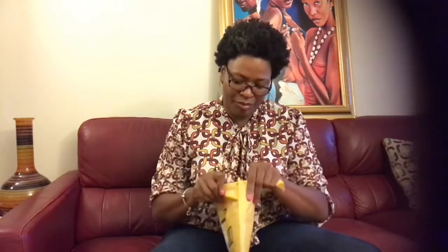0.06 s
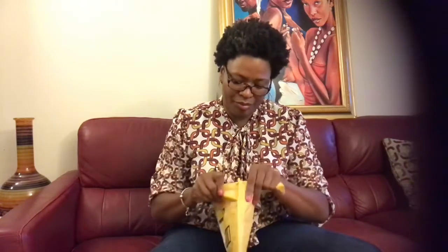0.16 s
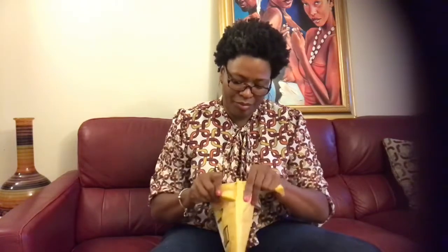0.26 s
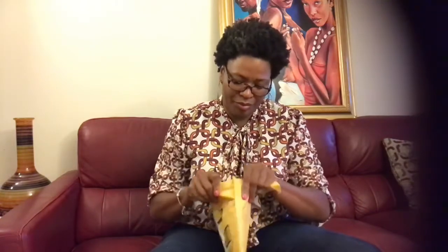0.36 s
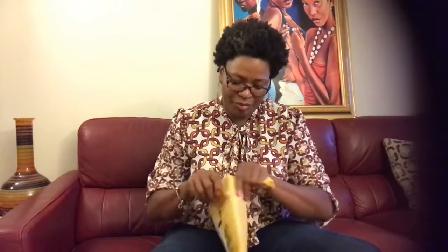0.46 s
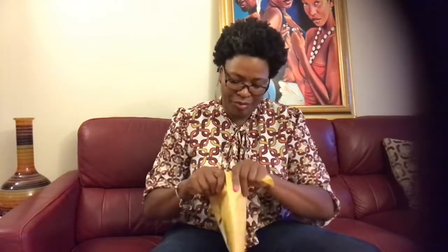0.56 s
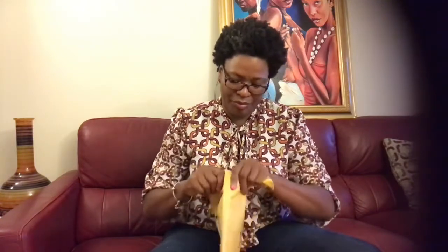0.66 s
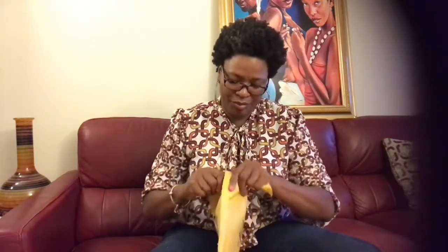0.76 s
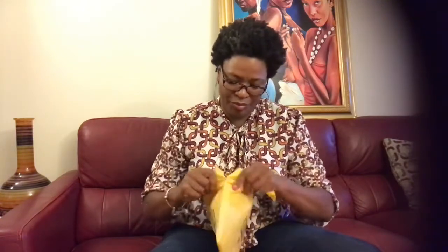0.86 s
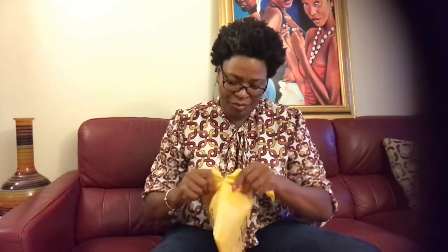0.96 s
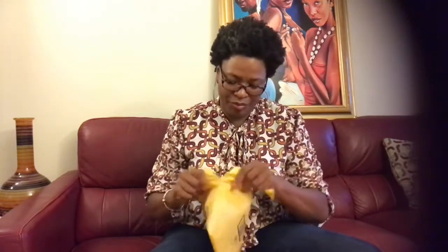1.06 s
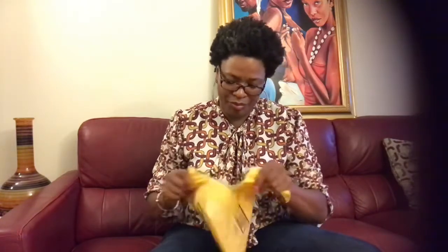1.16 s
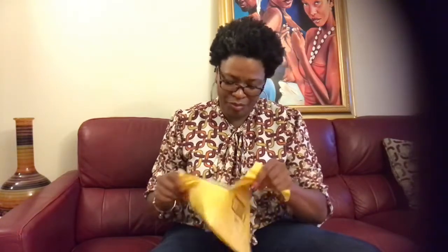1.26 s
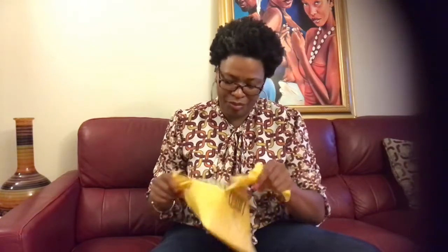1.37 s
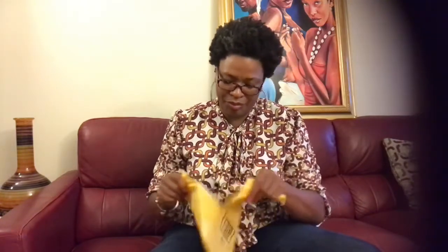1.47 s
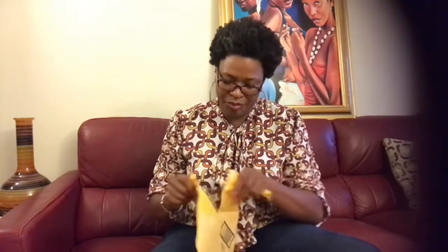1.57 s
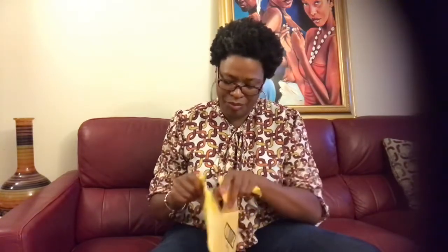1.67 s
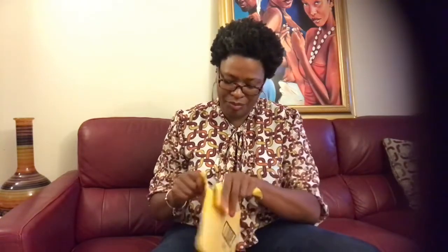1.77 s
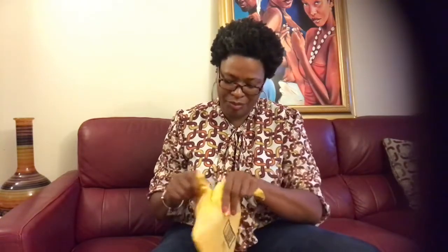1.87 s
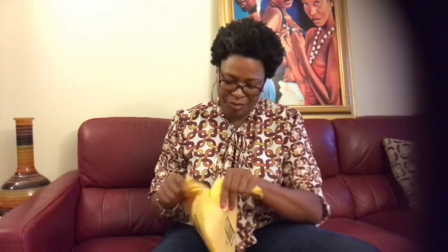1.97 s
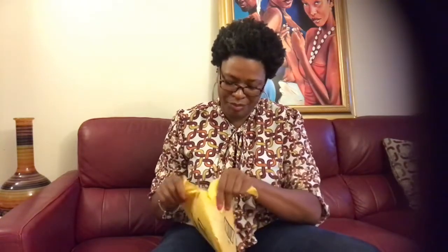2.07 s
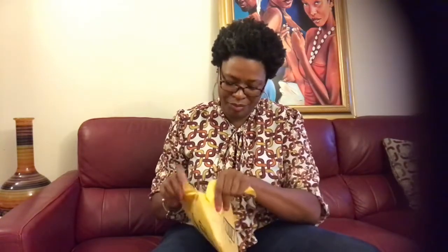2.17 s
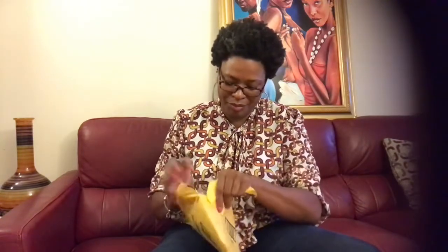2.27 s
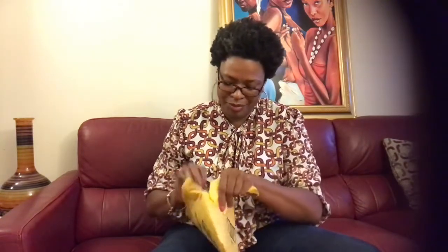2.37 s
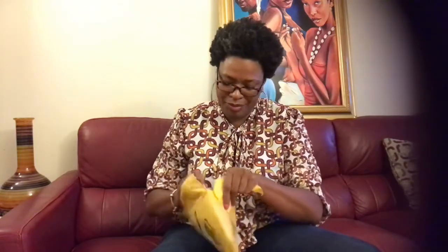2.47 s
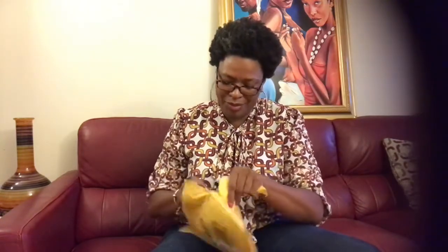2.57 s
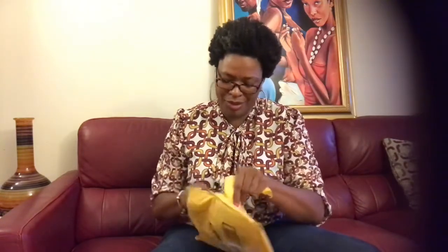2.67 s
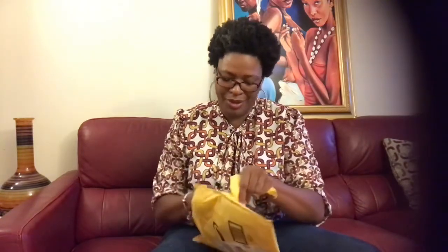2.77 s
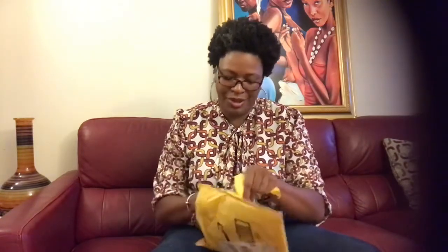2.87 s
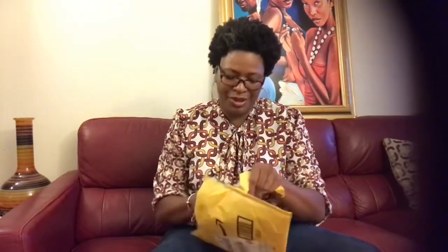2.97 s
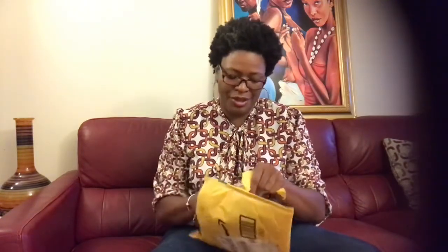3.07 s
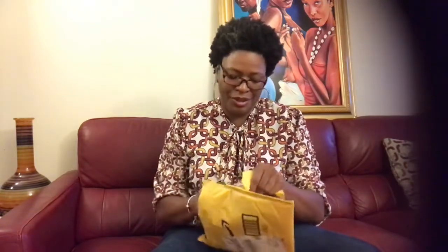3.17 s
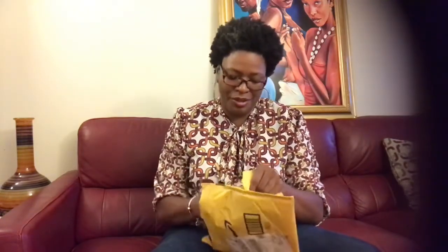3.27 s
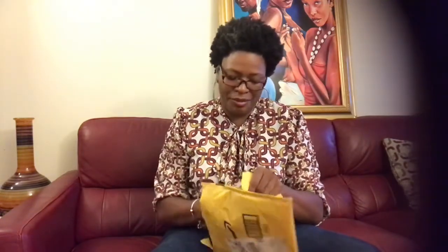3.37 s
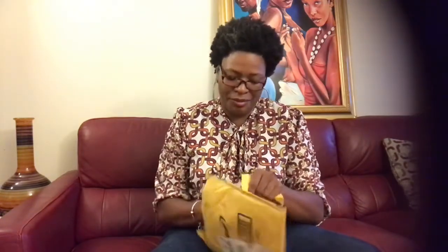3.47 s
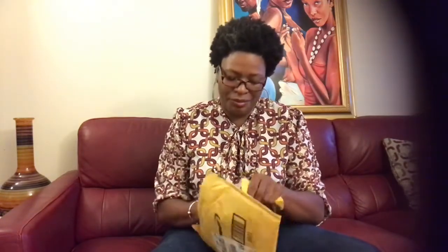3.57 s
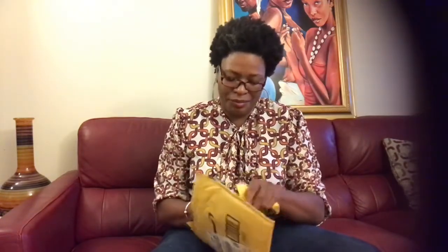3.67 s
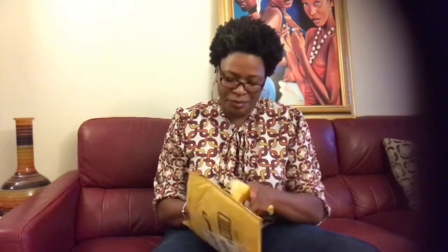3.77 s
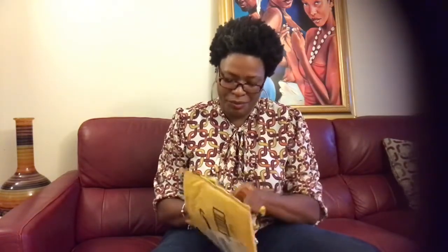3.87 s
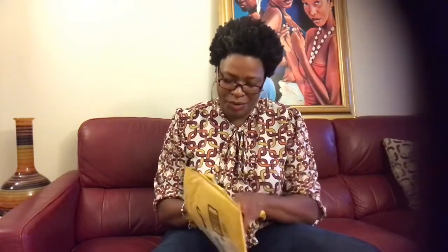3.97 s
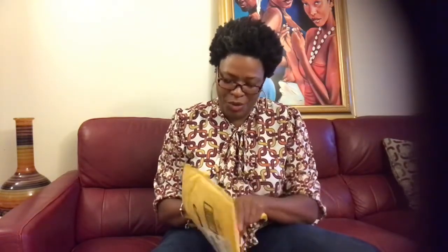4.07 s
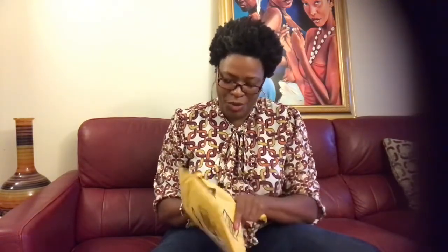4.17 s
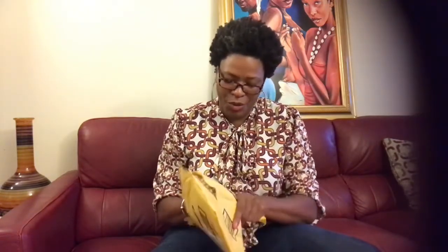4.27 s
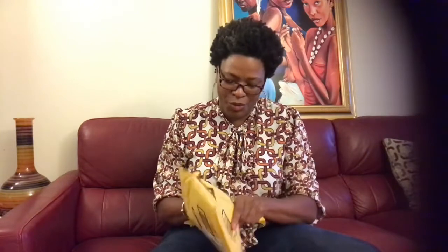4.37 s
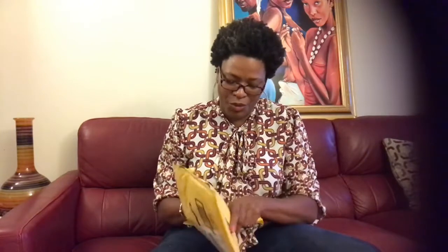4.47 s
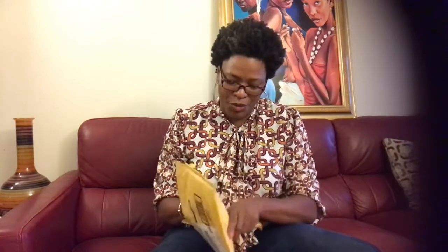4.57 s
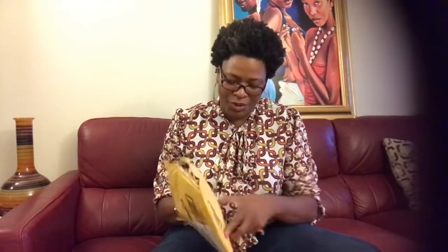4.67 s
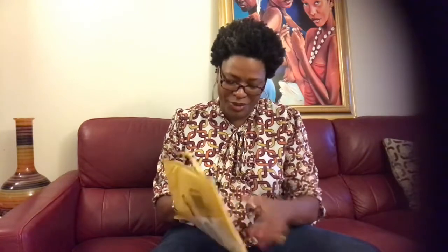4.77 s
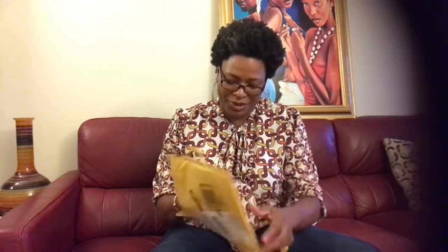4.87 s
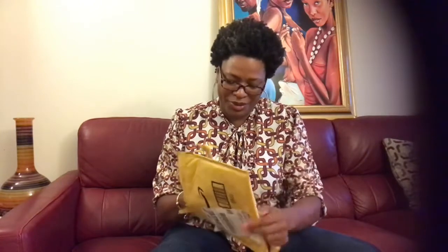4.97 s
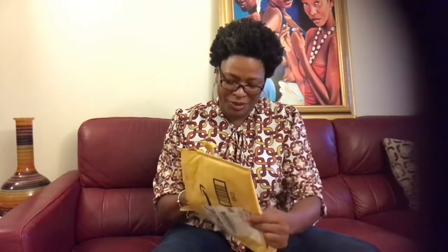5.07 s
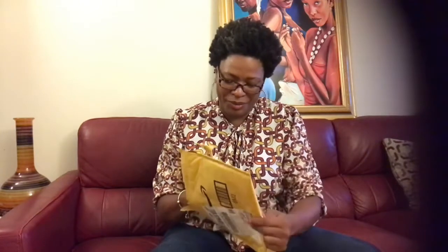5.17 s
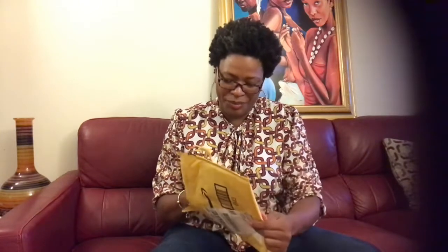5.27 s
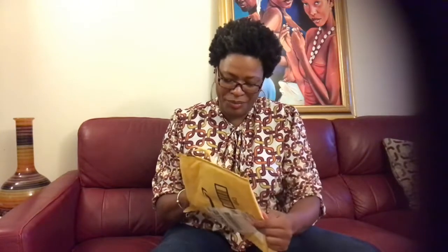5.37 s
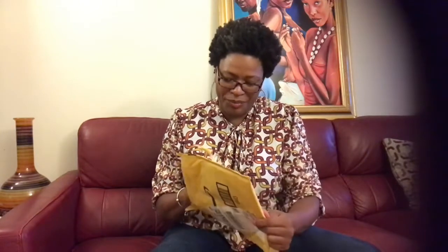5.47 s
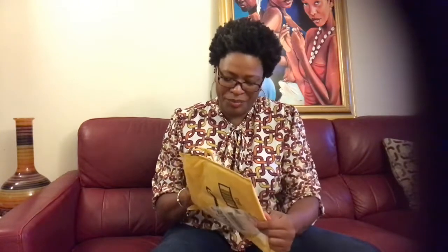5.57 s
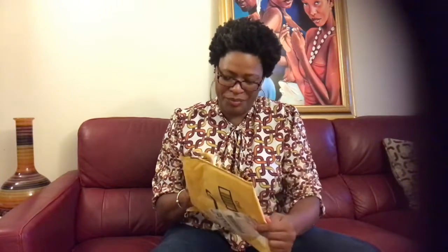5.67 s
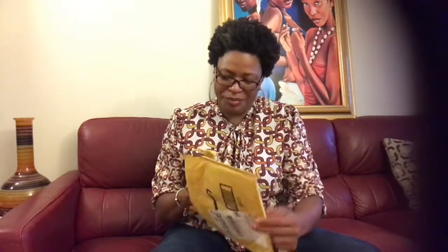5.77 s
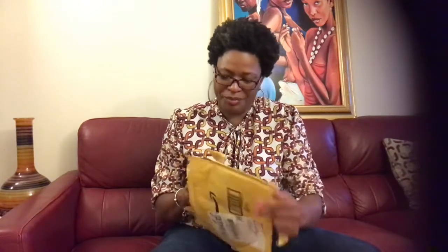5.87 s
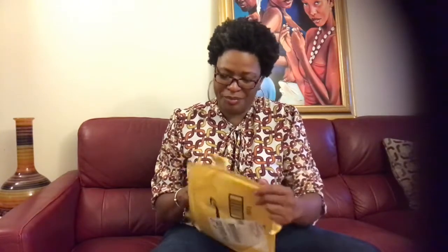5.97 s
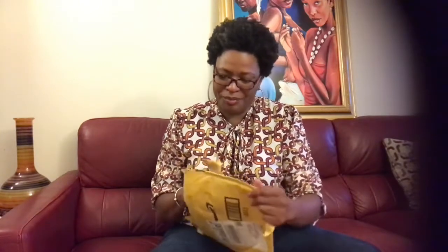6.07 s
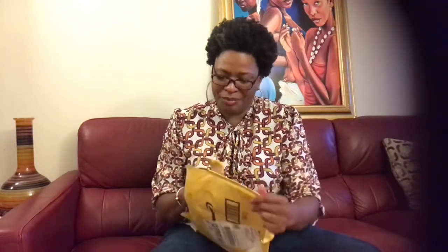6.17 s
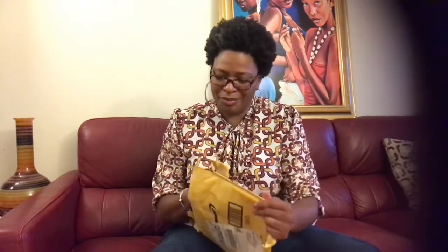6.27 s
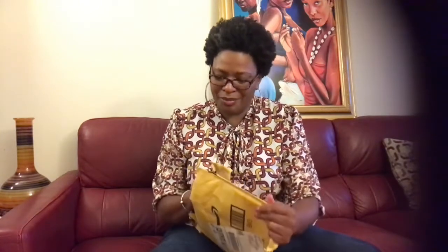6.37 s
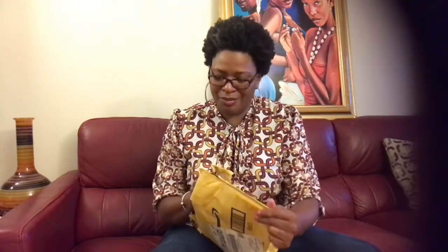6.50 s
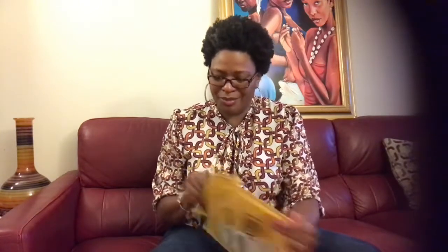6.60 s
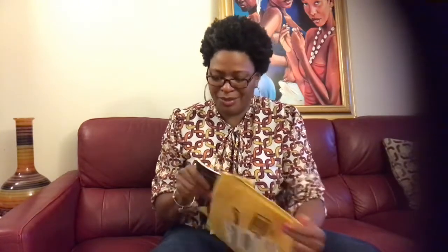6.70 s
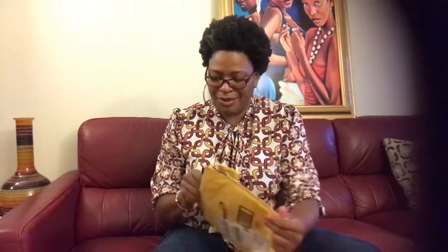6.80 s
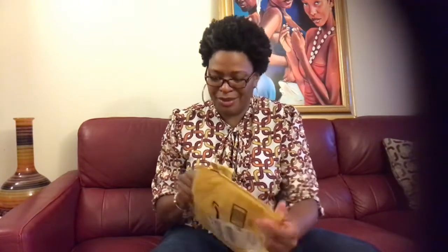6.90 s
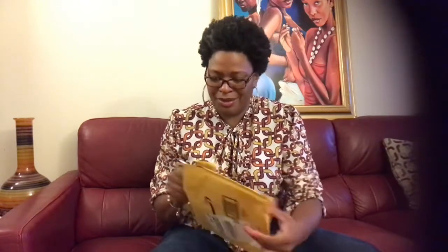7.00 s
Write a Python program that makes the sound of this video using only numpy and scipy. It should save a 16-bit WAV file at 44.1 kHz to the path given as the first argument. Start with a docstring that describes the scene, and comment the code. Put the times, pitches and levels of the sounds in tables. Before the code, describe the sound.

A padded paper mailer is ripped open in a loud crackling burst near one second, then handled with soft rustles, ending with a sharp late pop.

```python
"""In a quiet furnished room, a padded paper mailer is torn open and turned over by hand.
Single creases buckle with snaps, each a click, a crack of fibres and a flip of the patch.
Between them random small folds rustle in swells that follow the hands, and a finger scrapes the pouch
by quick slips that ring its air. Sparse echoes make the walls answer; bass-heavy noise rumbles below."""
import sys
import numpy as np
from scipy import signal
from scipy.fft import rfft, irfft
from scipy.io import wavfile
from scipy.ndimage import uniform_filter1d

SR = 44100
rng = np.random.default_rng(int(sys.argv[2]) if len(sys.argv) > 2 else 0)


def transcribe(signal):
    """Save signal, clipped to [-1, 1], as a 16-bit WAV file at the path in sys.argv[1]."""
    frames = np.atleast_2d(signal).T
    limited = np.clip(frames, -1, 1)
    pcm = np.round(limited * 32767).astype(np.int16)
    wavfile.write(sys.argv[1], SR, pcm)


N = 310464  # samples


def gain_of(db):
    """Decibel law: amplitude grows tenfold every 20 dB."""
    return 10 ** (np.asarray(db) / 20)


def evened(x):
    """Normalisation by effective value: the signal gets an RMS of one."""
    return x / np.sqrt(np.mean(x ** 2) + 1e-20)


def read(points, hz):
    """Logarithmic frequency scale: values between the points are interpolated along it."""
    point_hz, value = np.transpose(points)
    return np.interp(np.log(hz + 1), np.log(point_hz + 1), value)


def add(mix, start, sound):
    """Superposition: a sound is summed into the mix from its start in seconds."""
    part = mix[round(start * SR):][:len(sound)]
    part += sound[:len(part)]


def causal(points, size=4096):
    """Minimum phase: the Hilbert transform of the log gain gives a filter without pre-ringing."""
    hz = abs(np.fft.fftfreq(size, 1 / SR))
    log_gain = np.log(gain_of(np.maximum(read(points, hz), -80)))
    spectrum = np.exp(np.conj(signal.hilbert(log_gain)))
    return np.fft.ifft(spectrum).real[:size // 4]


# Spectrum of the room's noise. Each row: frequency in Hz, relative density in dB per Hz.
RUMBLE_SPECTRUM = [(25, -31), (45, 2.5), (100, -2), (170, -10.5), (350, -7), (1200, -19), (3000, -19),
                   (6500, -21), (8000, -27), (16000, -36)]
RUMBLE_DB = -60  # RMS level


def rumble():
    """Stationary noise: random phases under a fixed spectrum give the house's steady, bassy rumble."""
    hz = np.fft.rfftfreq(N, 1 / SR)
    spectrum = rfft(rng.standard_normal(N)) * gain_of(read(RUMBLE_SPECTRUM, hz))
    return gain_of(RUMBLE_DB) * evened(irfft(spectrum, N))


# Reflections off the lap and the sofa. Each row: delay in seconds, gain in dB.
NEAR_BOUNCES = [(.0024, -29), (.0048, -30)]
# Decay in the room. Each row: frequency in Hz, time to fall by 60 dB in seconds.
WALL_DECAY = [(250, 0.22), (1000, 0.43), (4000, 0.5), (12000, 0.54)]


def room(x):
    """Reverberation: two dull near bounces join sparse taps that swell in and die band by band."""
    taps = np.zeros(SR)
    at = np.arange(200, SR - 20, 20)
    taps[at + rng.integers(0, 20, len(at))] = rng.choice([-1., 1.], len(at))
    hz, t, bands = signal.stft(taps, SR, nperseg=256)
    swell = 1 - np.exp(-t / 0.0043)
    far_wall = 1 + 0.28 * np.exp(-((t - .03) / 0.0058) ** 2)  # stronger around its return
    decay = gain_of(-60 * t / read(WALL_DECAY, hz)[:, None])
    tail = signal.istft(bands * (swell * far_wall) * decay, SR, nperseg=256)[1]
    tail *= gain_of(-4.5) / np.linalg.norm(tail)
    dull = signal.windows.hann(9) / 4  # a smoothing pulse of unit sum
    for delay, db in NEAR_BOUNCES:
        add(tail, delay, gain_of(db) * dull)
    return signal.fftconvolve(x, tail)[:N]


def jump(hz, cycles, sag, turn):
    """Snap-through: a patch of paper flips in a few cycles that start fast and sag towards hz."""
    u = np.arange(400) / SR * hz / cycles
    swing = cycles * (u + sag * (1 - np.exp(-3 * u))) + turn  # phase in turns
    return u * np.exp(1 - 3 * u) * np.sin(2 * np.pi * swing)


# Overall tone colour of the rustle as picked up, with dips in the treble.
# Each row: frequency in Hz, relative gain in dB per Hz.
PICKUP_COLOUR = [(70, -18.5), (200, -9.5), (360, -4), (700, -1.5), (1300, -1.5), (2300, -4.5), (3200, -2.5),
                 (4800, -6), (6400, -6), (7500, -18.5), (8800, -16.5), (10500, -23.5), (11800, -17.5),
                 (16000, -25)]


def folds(lo_hz, hi_hz, per_s, spread_db, cycles, clump_db, count=16):
    """Crackling noise: random small folds of many pitches come in clumps, with unequal sizes."""
    happens = rng.random(N) < per_s / SR
    size = happens * gain_of(spread_db * np.minimum(rng.exponential(1, N), 5))
    clumps = evened(uniform_filter1d(rng.standard_normal(N), size=500))
    size *= gain_of(clump_db * clumps)
    kind, out = rng.integers(0, count, N), np.zeros(N)
    for k, hz in enumerate(np.geomspace(lo_hz, hi_hz, count)):
        grain = jump(hz, cycles, 0.19, rng.random())
        grain *= np.sqrt(hz) / np.linalg.norm(grain)
        out += signal.oaconvolve(size * (kind == k), grain)[:N]
    return evened(signal.oaconvolve(out, causal(PICKUP_COLOUR))[:N])


# Moves of the hands: each swells, holds and dies away. Each row: start of the hold in seconds, rise, hold
# and fall in seconds, crinkle level in dB, then three levels in dB above the crinkle: large folds,
# ring of the pouch, fine fibres.
HAND_MOVES = [(0.0, .01, 0.0037, 0.082, -41.5, -1.5, -6, -9),
              (0.044, .05, 0.068, 0.18, -53, -5.5, -7, -2.5), (0.242, 0.093, 0.17, .2, -57, -5.5, -7, -6.5),
              (0.457, 0.12, 0.087, 0.22, -50.5, -3, -0.5, -5), (0.65, .1, 0.065, .1, -53.5, -10, -12, -9),
              (0.754, 0.087, 0.079, .05, -50, -8.5, -1, -5),
              (0.834, 0.039, 0.055, 0.044, -31.5, -8.5, -3, -7),
              (1.02, 0.17, .015, 0.041, -46.5, -8, -5, -7.5), (1.084, 0.011, .02, 0.044, -35, -2, -18, -4),
              (1.127, 0.032, 0.034, .14, -24, -4, -6, -6.5), (1.32, 0.11, 0.013, 0.073, -35, -4, -8, -5.5),
              (1.42, 0.07, 0.045, 0.18, -50, -6, -2, -8), (1.51, 0.12, 0.018, 0.49, -46, -5, -5, -8),
              (1.806, 0.28, 0.042, 0.42, -47, -9, -8.5, -3), (2.106, 0.071, .01, 0.23, -53, -11, -10, 0.5),
              (2.217, 0.2, 0.011, 0.29, -55.5, -2, -3, -1), (2.489, .035, .01, 0.24, -51, -8, -7, -6.5),
              (2.7, 0.26, .015, 0.18, -50.5, -8.5, -7.5, -5), (2.81, 0.067, .005, .12, -55, -5, -4, -14),
              (2.91, 0.16, 0.087, 0.15, -49, -3.5, -5.5, -8.5), (3.08, 0.039, 0.094, 0.17, -57, 4, 3, -14),
              (3.19, 0.19, 0.0092, 0.18, -46.5, -4.5, -3.5, -10.5),
              (3.394, 0.25, 0.12, 0.26, -51.5, -4.5, -7.5, -9.5),
              (3.62, 0.099, 0.004, 0.18, -47, -9, -7, -11), (4.006, 1, .02, 0.25, -51, -6, -5, -4),
              (4.081, 0.062, 0.0066, 0.16, -49, 2, 2, -4.5), (4.212, 0.21, 0.017, 0.26, -49, -1, -3, -7),
              (4.47, .3, 0.16, 0.22, -54, -6, -8, -6), (4.685, 0.14, .005, 0.091, -48.5, 0.5, 3, -10),
              (4.989, 0.023, 0.024, 0.22, -48, -6.5, -6.5, -8),
              (5.194, 0.24, 0.26, 0.33, -53.5, -13, -8.5, -11),
              (5.519, 0.096, .005, 0.11, -49, -5, -9, -10), (5.764, 0.1, 0.0058, 0.23, -52, -16, -8, -5.5),
              (5.939, 0.031, 0.14, 0.28, -48, -9.5, -6.5, -9),
              (6.327, 0.19, 0.0091, 0.6, -53.5, -7, -7, -13),
              (6.591, 0.023, 0.038, 0.075, -37, 0.5, -10, -9.5),
              (6.803, 0.14, 0.0084, 0.44, -47, -13.5, -10, -9.5)]
SWING_DB = 20  # how far a move swells in its rise time and dies in its fall time


def handling():
    """Energy summation: the powers of overlapping moves add up to a gain for each size of fold."""
    t = np.arange(0, N, 64)[:, None] / SR
    full, rise, hold, fall, crinkle_db, *above_db = np.transpose(HAND_MOVES)
    before = np.maximum(full - t, 0) / abs(rise)
    after = np.maximum(t - full - hold, 0) / abs(fall)
    power = gain_of(2 * (crinkle_db - SWING_DB * (before + after)))
    gains = []
    for db in (0 * full, *above_db):
        coarse = np.sqrt(power @ gain_of(2 * db))
        gains.append(np.interp(np.arange(N) / SR, t[:, 0], coarse))
    return gains


# Air in the padded pouch: resonance in Hz, width in Hz.
POUCH_AIR = (1230, 260)


def rustle():
    """Size scaling: larger folds sound lower, so four bands of folds follow the hands."""
    large = folds(147.7, 888, per_s=1500, spread_db=2.5, cycles=2.36, clump_db=3.0)
    knocks = folds(971, 1516, per_s=700, spread_db=2.5, cycles=3.47, clump_db=1.5)
    hz, width = POUCH_AIR
    air = signal.lfilter(*signal.iirpeak(hz, hz / width, SR), knocks)
    pouch = evened(knocks + gain_of(-2.0) * air)
    crinkle = folds(1730, 6830, per_s=4000, spread_db=0.0, cycles=2.5, clump_db=0.5)
    fine = folds(6500, 18400, per_s=6000, spread_db=2.5, cycles=3.36, clump_db=1.3)
    layers = (crinkle, large, pouch, fine)
    return sum(gain * layer for gain, layer in zip(handling(), layers))


# A finger slides along the pouch. Each row: start in seconds, length in seconds, RMS level in dB before the
# fades, ring at the start in Hz, ring at the end in Hz.
FINGER_SCRAPES = [(1.44, 0.27, -46.5, 1320, 1230), (3.054, 0.21, -45.5, 1150, 1230),
                  (4.09, .1, -49.5, 1410, 1380), (4.208, .15, -46.5, 1260, 1160)]
SCRAPE_WIDTH_HZ, SLIPS_PER_S, SCRAPE_FADE_DB = 120, 1500, -6


def scrape(start, length, db, from_hz, to_hz):
    """Stick-slip: uneven slips ring the air in the pouch, whose pitch drifts as it changes shape."""
    u = np.arange(0, length, 1 / SR) / length
    slips = rng.standard_normal(len(u)) * (rng.random(len(u)) < SLIPS_PER_S / SR)
    turn = np.exp(2j * np.pi * np.cumsum(from_hz + (to_hz - from_hz) * u) / SR)
    r = np.exp(-np.pi * SCRAPE_WIDTH_HZ / SR)
    # a decaying resonator in a frame that rotates at the drifting pitch
    ring = (turn * signal.lfilter([1], [1, -r], slips / turn)).real
    fade = gain_of(db + SCRAPE_FADE_DB * u) * np.sin(np.pi * u) ** .3
    return start, fade * evened(ring)


# Modes of the whole mailer after a flip. Each row: mean frequency in Hz, width in Hz,
# mean level in dB relative to the flip.
SHEET_MODES = [(374, 74, -15), (824, 120, -15), (1230, 420, -16)]


def sheet_ring(flip_db, draw):
    """Modal vibration: a flip shakes the mailer into damped sines of slightly random pitch and level."""
    t = np.arange(1500) / SR
    ring = np.zeros(len(t))
    for k, (hz, width, db) in enumerate(SHEET_MODES):
        mode_hz = hz * (1 + 0.091 * draw[3 + k])
        mode = np.sin(2 * np.pi * mode_hz * t) * np.exp(-np.pi * width * t)
        ring += gain_of(flip_db + db + 2.3 * draw[7 + k]) * mode
    return ring


# Single creases buckling. Each row: time in seconds, peak of the patch's flip in dB, pitch the flip sags
# towards in Hz, peak of the ridge's click in dB, peak of the fibres' crack in dB (peaks before the high-pass).
CREASE_SNAPS = [(0.0907, -31.5, 1500, -33, -32), (0.142, -58.5, 1810, -47, -36.5),
                (0.233, -46, 1500, -33, -30.5), (0.243, -55, 1310, -47, -31), (0.451, -28, 860, -51, -48),
                (0.4833, -37, 1270, -37, -48), (0.5288, -31, 1390, -24.5, -27),
                (0.571, -33.5, 940, -51, -45), (0.641, -47, 1820, -34, -52), (0.671, -40, 1440, -55, -34.5),
                (0.7475, -38, 1430, -29, -31.5), (0.7795, -26.5, 1160, -30, -34),
                (0.8293, -16.5, 1460, -16.5, -22), (0.837, -19.5, 1080, -12, -23),
                (0.8544, -15, 1590, -20, -28), (0.8846, -19, 1060, -9.5, -16),
                (0.8913, -14.5, 1120, -18, -28), (1.0629, -32, 1220, -30, -31),
                (1.078, -10, 1230, -9, -16.5), (1.1099, -19, 1110, -16, -16),
                (1.1173, -12, 1060, -8.5, -16), (1.1367, -12, 1090, -10, -18),
                (1.1479, -22, 1610, -12, -12), (1.158, -15, 1300, -22, -16), (1.1923, -14, 1110, -15, -27),
                (1.2069, -16.5, 980, -12, -15), (1.2197, -17.5, 1400, -28, -27),
                (1.2826, -24, 930, -21, -19), (1.317, -30, 806, -30, -28), (1.337, -30, 316, -40, -40),
                (1.4517, -28, 1230, -34, -42), (1.483, -34, 1410, -42, -45),
                (1.5073, -24.5, 1230, -44, -32), (1.77, -50, 1320, -39, -36.5),
                (1.8772, -35, 710, -40, -42), (1.935, -29, 2050, -23.5, -37), (2.003, -33, 950, -55, -48),
                (2.434, -59, 1300, -55, -44), (2.4717, -52, 600, -39.5, -47),
                (2.5942, -55, 910, -40, -36.5), (2.64, -48, 420, -50, -47), (2.71, -43, 400, -50, -50),
                (2.798, -30.5, 1130, -35.5, -36), (2.8935, -27.5, 1130, -36, -50),
                (2.9481, -44, 1110, -33, -47), (3.065, -32.5, 1020, -39, -50), (3.127, -33, 1290, -37, -49),
                (3.1924, -32, 1100, -32, -43), (3.2158, -30.5, 1150, -39, -50),
                (3.3323, -32.5, 1680, -39, -45), (3.4076, -21, 1530, -20, -32),
                (3.521, -36.5, 1060, -47, -31), (3.5745, -33.5, 1140, -41, -35),
                (3.6207, -24, 1140, -26.5, -31), (4.036, -35, 1190, -35, -53),
                (4.0867, -22.5, 1210, -25.5, -40), (4.2151, -30, 1110, -33, -37),
                (4.425, -42, 1120, -30.5, -43), (4.592, -37, 1120, -48, -40), (4.6201, -34, 1450, -36, -40),
                (4.654, -29.5, 1180, -46, -45), (4.6836, -29, 1300, -37, -44),
                (5.0297, -33.5, 1140, -48, -44), (5.093, -41.5, 450, -55, -55),
                (5.1173, -42, 1170, -57, -54), (5.5219, -36, 1480, -32.5, -39),
                (5.788, -35, 1710, -32, -54), (5.9506, -38.5, 400, -32, -35.5),
                (5.9805, -31, 1630, -42, -34), (6.0065, -29, 1810, -23, -50), (6.28, -45, 1220, -43, -49),
                (6.396, -44, 1550, -44.5, -54), (6.4556, -42.5, 1520, -45, -45),
                (6.558, -34, 1290, -37, -38), (6.5842, -7, 950, -17.5, -38), (6.6038, -21, 1040, -24, -41),
                (6.6276, -20, 1710, -13.5, -23), (6.8063, -52, 1200, -33, -31.5),
                (6.8755, -35, 586, -57, -51), (6.9424, -39, 1050, -55, -51), (6.989, -34, 1360, -44, -56),
                (7.016, -39, 1340, -37, -47)]
RIDGE_HZ, RIDGE_SCATTER = 3390, 0.1  # ridges click near one pitch; scatter as a fraction of it


def snaps():
    """Buckling: the ridge clicks and fibres crack, the patch beside it flips and shakes the mailer."""
    out, t = np.zeros(N), np.arange(400) / SR
    treble = causal([(4000, -30), (5600, 0), (6600, 0), (7500, -10), (16000, -17)])  # (Hz, dB)
    chance = rng.standard_normal((len(CREASE_SNAPS), 800))
    for (s, flip_db, flip_hz, click_db, crack_db), draw in zip(CREASE_SNAPS, chance):
        flip = jump(flip_hz, 1.27, 0.17, 0.23 * draw[0])
        click = jump(RIDGE_HZ * (1 + RIDGE_SCATTER * draw[1]), 1.88, 0.016, 0.49 * draw[2])
        crack = np.convolve(draw[:400] * np.exp(-t / .0006), treble)[:400]
        parts = ((flip_db, flip), (click_db, click), (crack_db, crack))
        snap = sum(gain_of(db) * part / abs(part).max() for db, part in parts)
        settling = gain_of(-21.5) * draw[400:] * np.exp(-t / 0.0031)  # the crease runs on for a moment
        add(out, s - .0002, snap)
        add(out, s + .0004, np.convolve(snap, settling))
        add(out, s + 0.00066, sheet_ring(flip_db, draw))
    # a small sheet cannot push bass into the air
    return signal.sosfilt(signal.butter(2, 230, "highpass", fs=SR, output="sos"), out)


def scene():
    """Direct and reverberant sound: the paper is heard both straight and by way of the room."""
    soft, sharp = rustle(), snaps()
    for row in FINGER_SCRAPES:
        add(soft, *scrape(*row))
    echoes = room(sharp + gain_of(-5.5) * soft)
    return (soft + sharp + echoes + rumble())[None]


EDGE_HZ = 15750


def record(dry):
    """Band limiting: a linear-phase low-pass removes the sound above the edge."""
    low_pass = signal.firwin(511, EDGE_HZ, window=("kaiser", 9), fs=SR)
    return signal.oaconvolve(dry, low_pass[None], "same")


dry = scene()
out = record(dry)
transcribe(out)
```